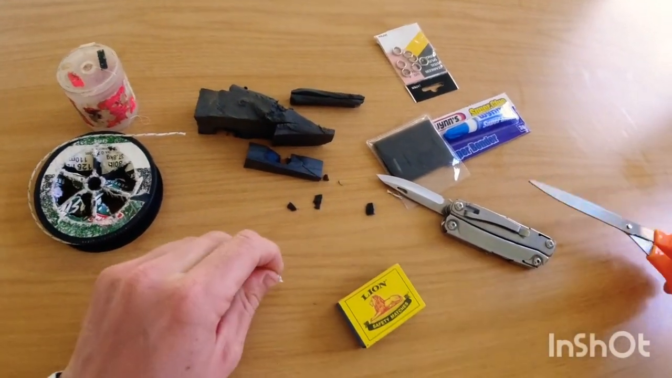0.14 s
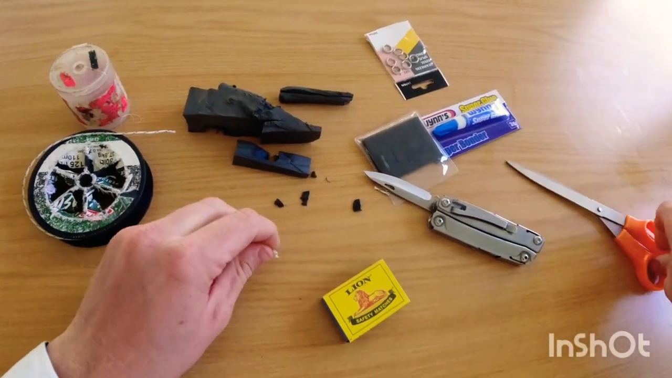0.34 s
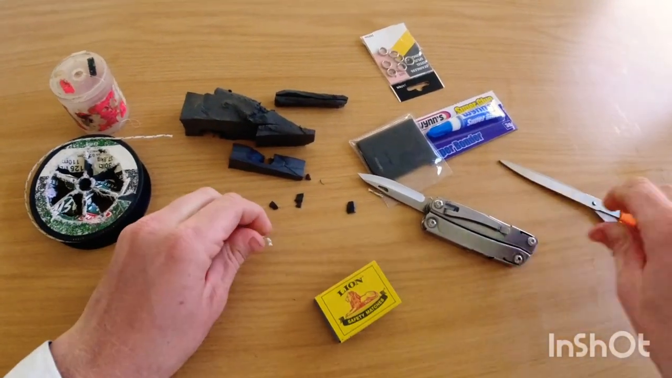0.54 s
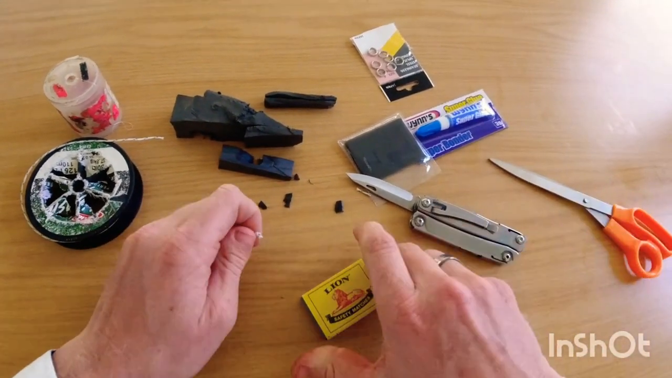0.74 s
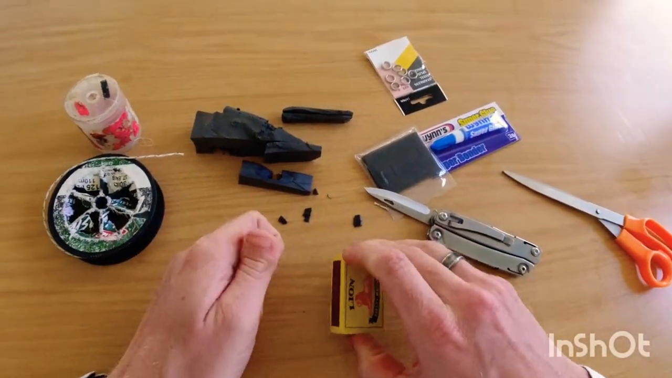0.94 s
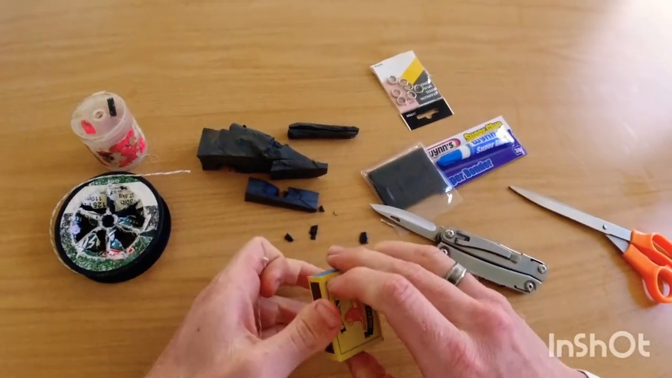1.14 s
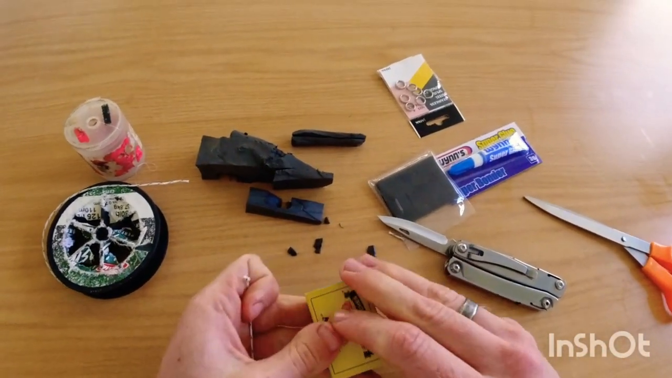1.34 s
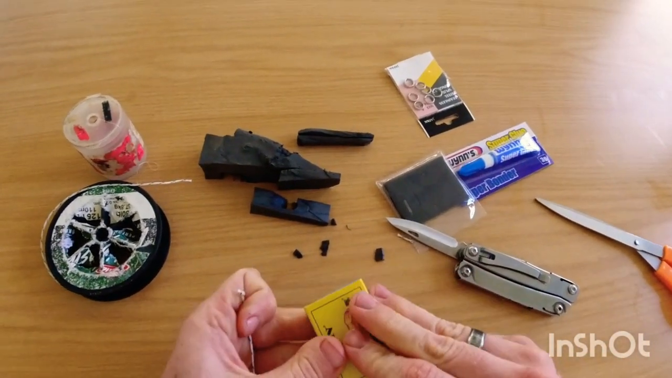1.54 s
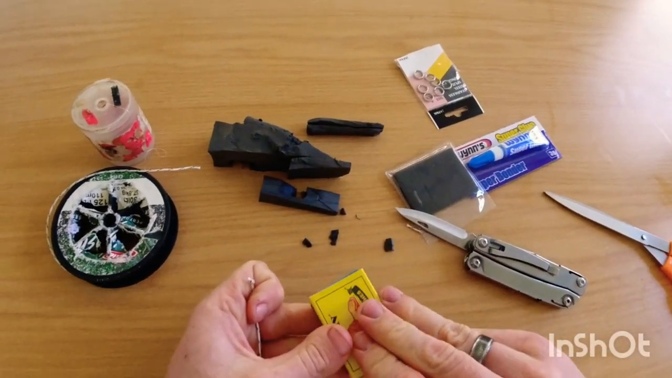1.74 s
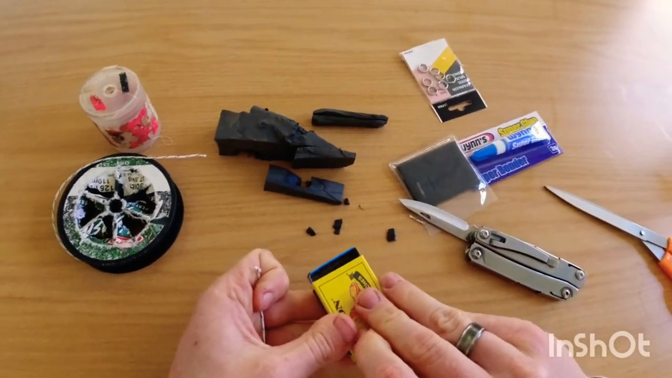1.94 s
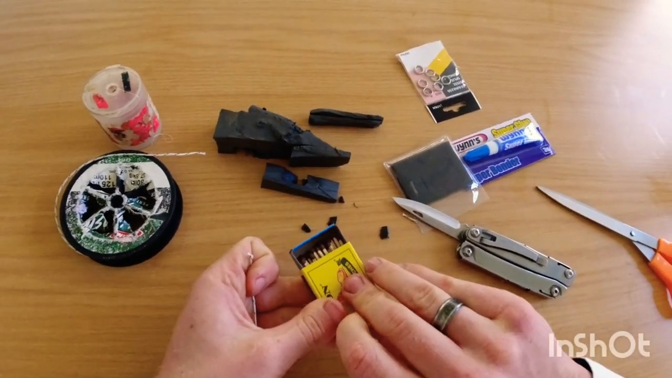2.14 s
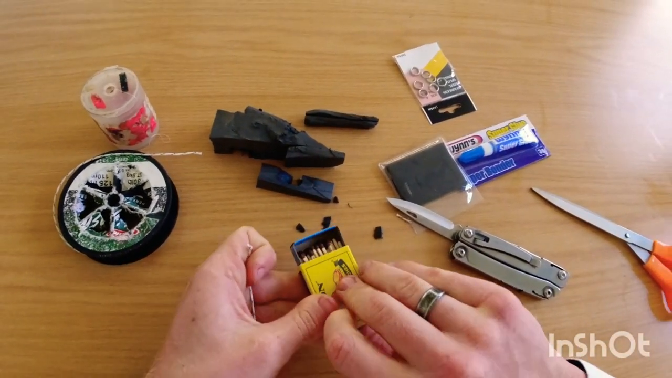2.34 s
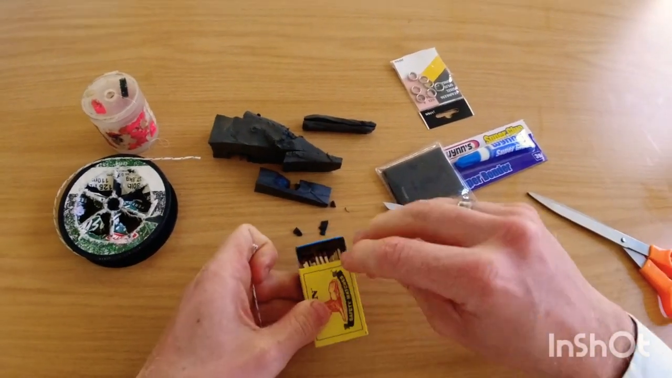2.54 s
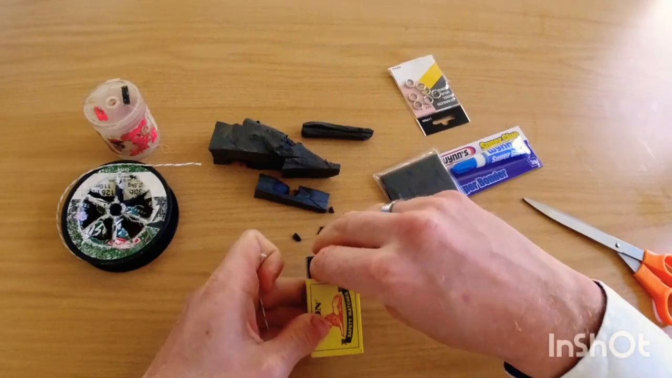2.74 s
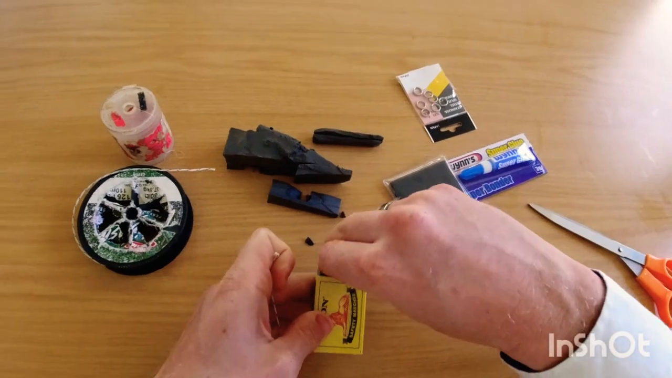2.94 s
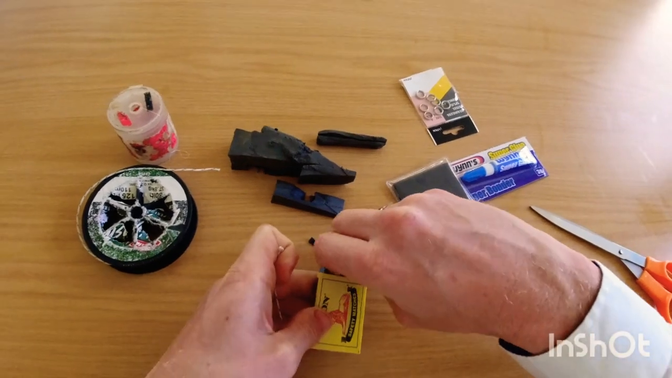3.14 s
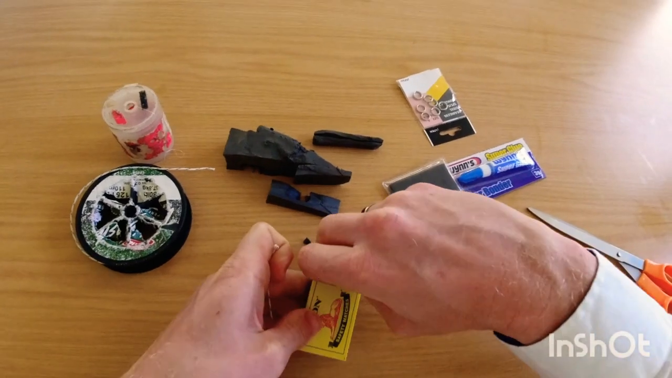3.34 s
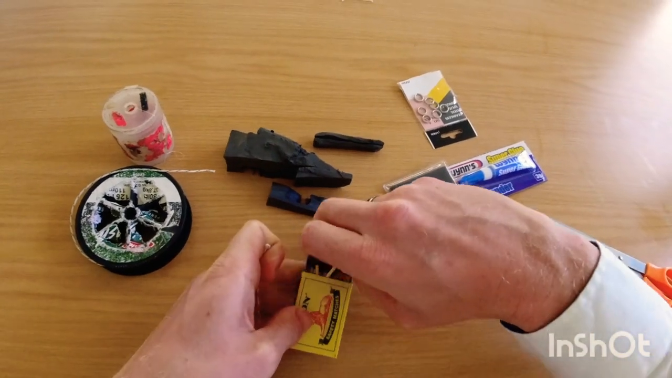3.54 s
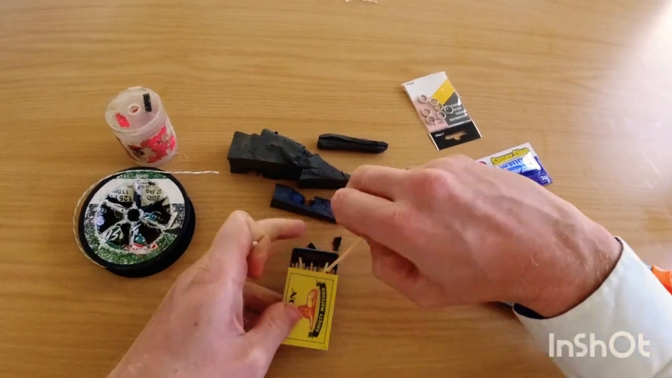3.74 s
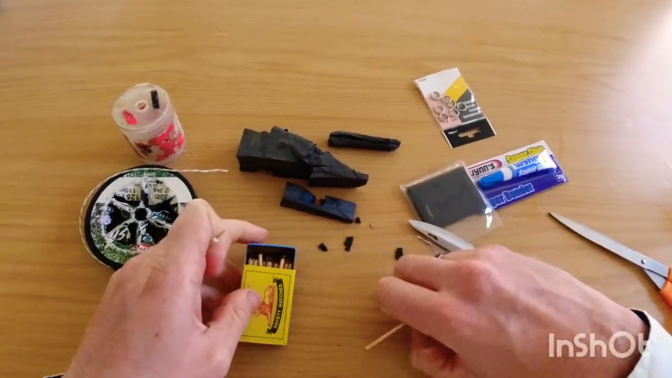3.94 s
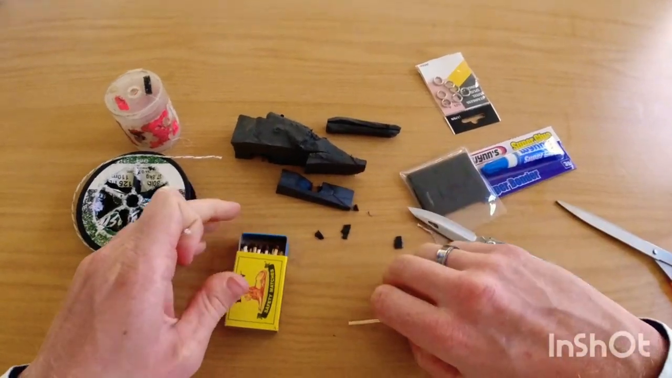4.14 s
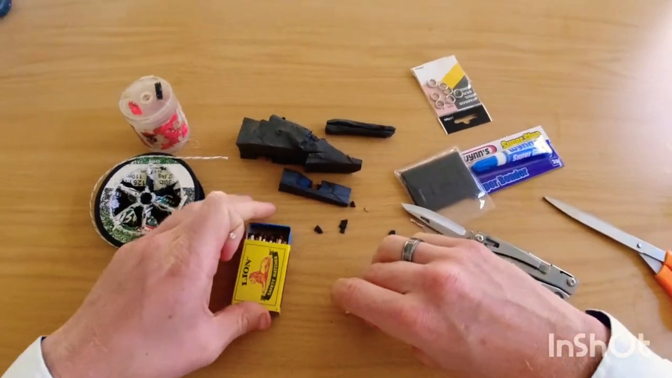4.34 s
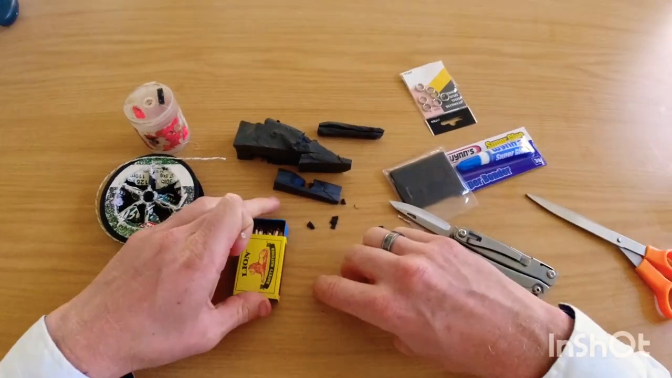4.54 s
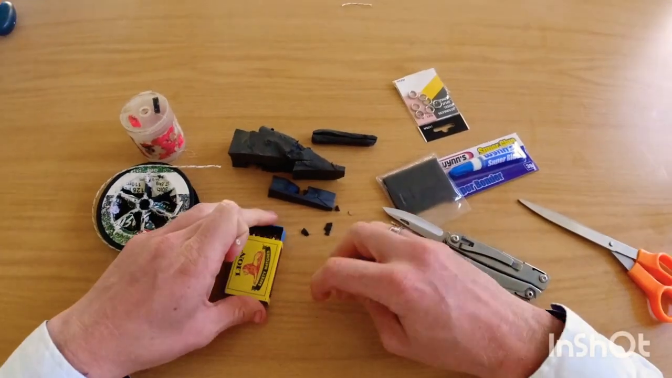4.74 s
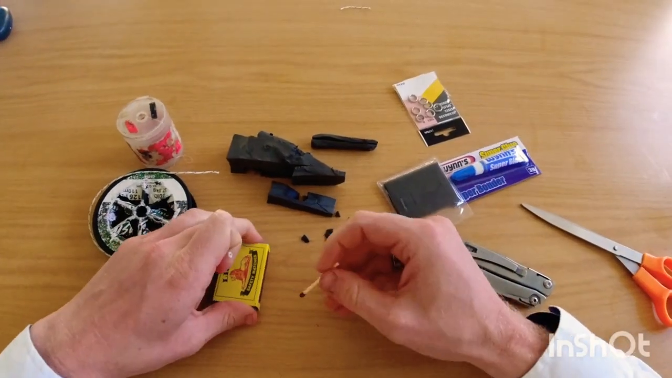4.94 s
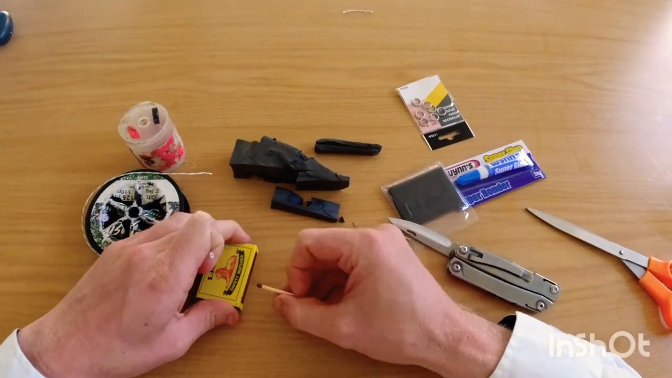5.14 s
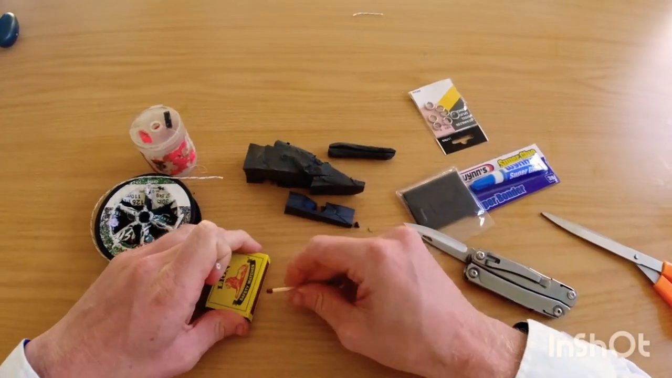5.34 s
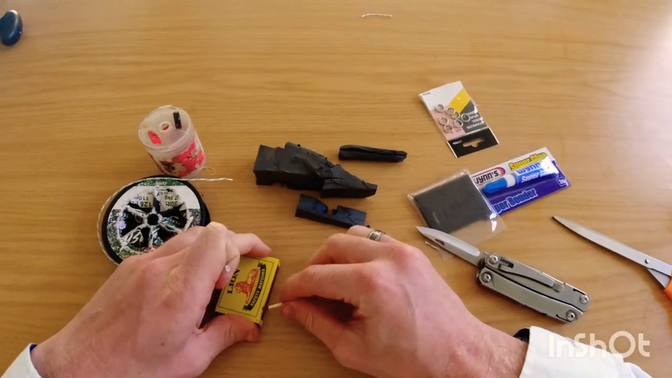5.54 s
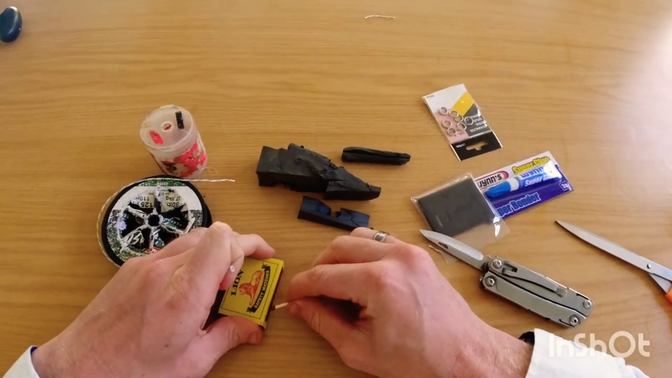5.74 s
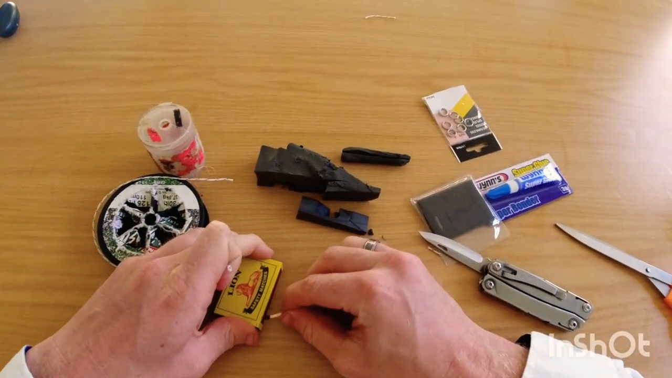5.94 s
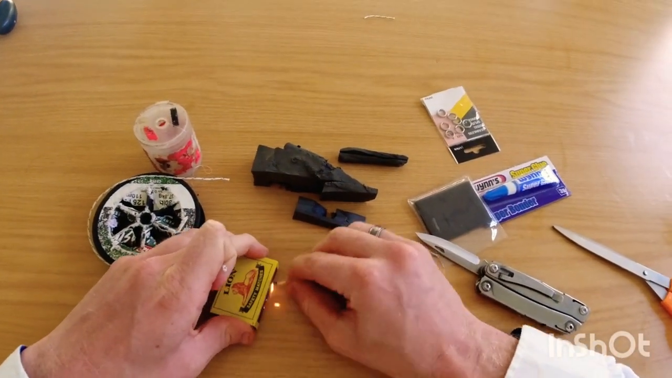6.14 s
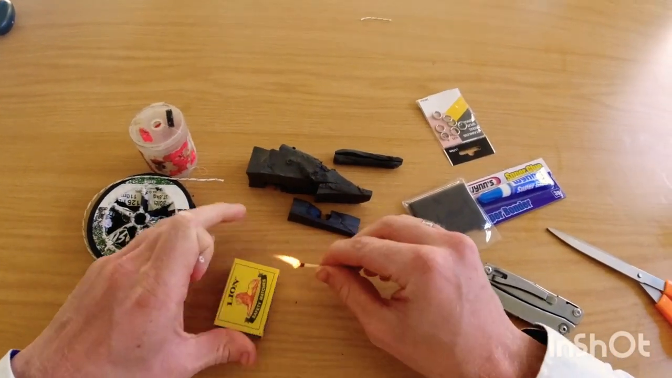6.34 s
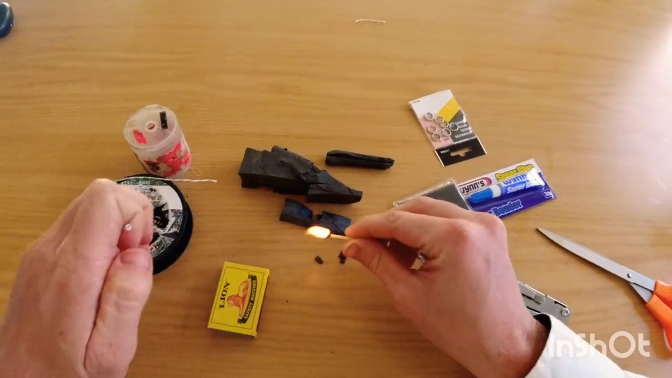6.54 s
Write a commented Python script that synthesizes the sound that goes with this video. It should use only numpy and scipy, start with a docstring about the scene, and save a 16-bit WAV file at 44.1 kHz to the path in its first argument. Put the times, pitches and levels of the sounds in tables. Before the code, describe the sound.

Scissors clatter onto a wooden table, a small matchbox slides open and matchsticks tick, then a match cracks alight and flares briefly in an echoing room.

```python
"""A matchbox handled close below the microphone, over a wooden table in a bare, echoing room: it is picked
up, its drawer slides open, fingers fish out a match and push the drawer shut; at last the match is struck.
Card and sticks are noise through damped resonances; the match is a scrape, a sharp pop and flaring gas noise.
Scissors set down first and a pocket knife knocked later ring with decaying modes, as does the table.
Skin judders over the table top as the box is steadied; echoes, standing waves and a low hush fill the room."""
import sys
import numpy as np
from scipy import signal
from scipy.fft import rfft, irfft, next_fast_len
from scipy.io import wavfile

SR = 44100
rng = np.random.default_rng(int(sys.argv[2]) if len(sys.argv) > 2 else 0)


def digitize_waveform(pressure):
    """Quantize a signal to 16-bit integers and store it at the path in sys.argv[1].

    Rows of a 2-D input are taken as channels; values are limited to [-1, 1].
    """
    field = np.atleast_2d(pressure).T
    bounded = np.clip(field, -1, 1)
    quanta = np.round(bounded * 32767).astype(np.int16)
    wavfile.write(sys.argv[1], SR, quanta)


N = 290561
T = np.arange(N) / SR

# cardboard and matchsticks ticking: (time [s], length [s], level over 5 ms before the trim [dB],
# lower wall [Hz], upper wall [Hz], upper wall [dB], contact)
TICKS = [(.918, 0.0021, -52, 2600, 4300, 6, "base"), (1.159, 0.0014, -53.5, 2500, 3900, -10, "corner"),
         (1.24, 0.0016, -56, 1900, 3200, -5, "finger"),
         (1.256, 0.00087, -45.5, 2200, 3900, -10.5, "finger"),
         (1.309, 0.0023, -59, 2200, 3200, -4, "finger"), (1.353, .0023, -55, 1900, 2900, -3, "finger"),
         (1.856, 0.0068, -44.5, 2200, 4100, -6.5, "finger"), (1.905, .007, -47.5, 2300, 4000, -5, "finger"),
         (1.95, 0.0079, -41.5, 2100, 3500, -4, "drawer"), (1.9615, 0.004, -37.5, 2100, 3700, -3, "drawer"),
         (1.984, 0.0043, -48, 2100, 3600, 2, "drawer"), (2.029, 0.0044, -43, 2200, 3900, 3, "drawer"),
         (2.061, 0.0025, -49, 2200, 4100, 10, "drawer"), (2.075, 0.011, -38, 2100, 3700, -4, "drawer"),
         (2.091, 0.0085, -37, 2100, 3900, 6, "drawer"), (2.791, 0.002, -40, 2300, 3500, -3, "floor"),
         (2.801, 0.0047, -35, 2200, 3400, -15, "tray"), (2.8075, 0.0041, -33, 2300, 3800, -5, "edge"),
         (2.815, 0.0023, -34.5, 2100, 3600, 4, "tray"), (2.8198, 0.0083, -33.5, 2300, 3500, 9.5, "edge"),
         (2.8775, 0.00028, -29, 2120, 3200, -7, "tray"), (2.8826, 0.0006, -36, 2700, 3400, 2, "stick"),
         (2.888, 0.0015, -38, 1920, 3200, -13, "tray"), (3.061, 0.0042, -41.5, 3000, 3900, -5, "stick"),
         (3.0866, 0.0027, -37.5, 3100, 4080, 3, "stick"), (3.0947, 0.0034, -45.5, 2400, 3360, 5, "floor"),
         (3.103, .002, -42, 2900, 3740, 11, "stick"), (3.117, .002, -48.5, 2700, 3900, 5, "stick"),
         (3.142, 0.002, -49, 2650, 3750, 1, "stick"), (3.157, 0.0018, -48.5, 2900, 4200, 13, "stick"),
         (3.166, 0.0038, -42.5, 2900, 3800, 1, "stick"), (3.179, 0.0012, -42.5, 2700, 3900, 7.5, "stick"),
         (3.189, 0.0022, -42, 2700, 3800, 10.5, "stick"), (3.208, 0.0024, -40, 2200, 3850, 6.5, "tray"),
         (3.2125, .002, -39, 2200, 3400, -7.5, "tray"), (3.2187, 0.0021, -44.5, 2260, 3480, 1.5, "tray"),
         (3.39, 0.0038, -55, 2600, 3320, -2.5, "stick"), (3.4105, .0015, -53, 2470, 3200, -6, "stick"),
         (3.4317, 0.0022, -52.5, 3000, 3600, 0.5, "stick"), (3.4716, 0.0018, -44.5, 2370, 3200, -6, "tray"),
         (3.4838, .006, -40.5, 2650, 4160, 11, "tray"), (3.5643, 0.0012, -50, 2900, 3520, 7.5, "stick"),
         (3.5769, .0045, -42, 2300, 3100, -1.5, "tray"), (3.592, 0.0035, -45.5, 2300, 3300, -1, "tray"),
         (3.619, 0.0071, -49.5, 2300, 3300, 0, "tray"), (3.6445, .0026, -50, 2200, 3200, -2, "tray"),
         (3.706, 0.003, -60.5, 2560, 3200, -6, "stick"), (3.725, 0.0019, -45.5, 2550, 3200, -7.5, "stick"),
         (3.7843, .0026, -47, 2880, 3700, 0, "stick"), (3.7942, .0012, -43, 2940, 3610, 1.5, "stick"),
         (3.8168, 0.0029, -52.5, 2900, 3600, 2.5, "stick"), (3.9655, 0.006, -46.5, 3000, 3860, 1, "corner"),
         (4.8245, 0.0055, -44.5, 2230, 3460, -2, "finger"), (4.832, 0.003, -48, 2440, 3200, -13, "corner"),
         (4.8815, 0.0081, -41, 2560, 3400, -6, "stick"), (4.9075, .0033, -47, 2670, 3400, -7, "stick"),
         (4.964, .006, -40.5, 2300, 3870, -6, "edge"), (4.992, 0.0075, -38, 3000, 5000, 0, "edge"),
         (5.06, 0.0047, -53.5, 2800, 3600, -3, "base"), (5.21, 0.025, -46, 2790, 4250, -5, "base"),
         (5.378, .015, -56, 2650, 3600, -8, "base"), (5.768, 0.0035, -52, 2690, 4200, -25, "base"),
         (5.783, 0.0017, -59.5, 2690, 4200, -19, "base"), (5.999, .0025, -49, 2600, 4650, -20.5, "head")]
# strokes of rubbing, from picking up the box to steadying it: (time [s], length [s],
# level before the trim [dB], lower wall [Hz], upper wall [Hz], upper wall [dB], contact)
RUBS = [(.874, 0.031, -57.5, 3050, 4400, -17, "corner"), (0.904, 0.049, -54.5, 2600, 4300, -6, "base"),
        (0.964, 0.047, -60, 2700, 4500, -4, "base"), (1.033, 0.12, -60.5, 2630, 3400, -1, "base"),
        (1.13, 0.043, -64.5, 2630, 4120, 0, "corner"), (1.238, .04, -56.5, 1940, 3000, -1, "finger"),
        (1.279, 0.069, -62, 1880, 2770, -8, "finger"), (1.464, .097, -60.5, 2100, 3400, -4, "grip"),
        (1.597, 0.076, -57, 1720, 4300, -3.5, "grip"), (1.705, 0.058, -68, 2440, 4900, 3, "grip"),
        (1.932, 0.1, -45.5, 1960, 3600, 5, "drawer"), (2.024, 0.064, -50.5, 2040, 3870, 2, "drawer"),
        (2.081, 0.046, -40.5, 2030, 3780, 0, "drawer"), (2.108, 0.047, -48, 1850, 3720, -1, "drawer"),
        (2.188, 0.098, -52.5, 1610, 3300, -2, "drawer"), (2.421, 0.064, -57, 2100, 3280, 3, "finger"),
        (2.463, 0.04, -50, 2170, 4160, 0.5, "drawer"), (3.051, 0.057, -52, 2680, 3820, 3, "stick"),
        (3.149, 0.074, -47, 2650, 3840, 7, "stick"), (3.232, .06, -55, 2180, 3600, -5.5, "tray"),
        (3.471, 0.043, -46, 2580, 4120, -4, "edge"), (3.568, 0.095, -48.5, 2330, 3160, -7.5, "tray"),
        (3.754, 0.046, -51.5, 2550, 3840, 1.5, "stick"), (3.861, .05, -57.5, 2470, 4390, -8, "corner"),
        (3.934, 0.077, -55, 2980, 4220, 6.5, "corner"), (4.421, 0.029, -52, 2760, 4400, -14, "corner"),
        (4.446, 0.034, -55, 2900, 4400, -2, "stick"), (4.661, 0.02, -55.5, 2200, 3310, -4.5, "finger"),
        (4.798, 0.053, -50, 2490, 3660, 2, "tray"), (4.862, 0.064, -46, 2600, 3630, -3, "edge"),
        (4.976, 0.024, -43.5, 3000, 4850, 0.5, "edge"), (4.999, 0.085, -53, 2630, 3870, 2, "base"),
        (5.145, 0.15, -55, 2790, 4250, 1, "base"), (5.657, 0.029, -62, 2350, 4080, -6, "head"),
        (5.748, 0.059, -60.5, 2670, 4350, -28, "base")]
# what touches what: contact: (sharpness [Q], hollow [Hz], hollow [dB], knock [dB], crisp at FIRM_DB [dB],
# room echo [dB], slips when rubbing [1/s], unevenness of grip [dB])
CONTACTS = {"finger": (4, 1203, -18.5, -21, -43, -0.5, 2500, 0),
            "grip": (6, 1197, -17, -25, -37, -4, 4000, 1.5),
            "corner": (5, 1200, -19.5, -20, -22.5, 2, 2500, 1),
            "head": (11.5, 1200, -11, -18, -36, -7, 2500, 0.5),
            "base": (6, 1225, 7, -6, -37, -5, 1500, 2.5), "floor": (1.5, 1047, 3.5, -2, -10, 3.5, 1500, 3),
            "drawer": (4, 1164, -12.5, -15.5, -19, -6.5, 3001, 5),
            "tray": (3, 1055.5, -7.5, -21.5, -27, -2.5, 898.5, 5.5),
            "stick": (2.5, 1037, -9.5, -16.5, -17, -1, 450, 0.5),
            "edge": (1.5, 954.5, -9, -24, -10, -0.5, 2200, 2.5)}
# fibres snapping: (frequency [Hz], level [dB])
CRISP = [(4000, -69), (5400, 3.5), (6200, 6.5), (7500, 5), (9000, -5.5), (13000, -2.5), (15000, -5.5)]
# a contact firmer than FIRM_DB has a stronger crisp edge but a lower treble limit; a lighter one a weaker edge
FIRM_DB, CRISP_PER_DB = -35.5, 0.7
FIRM_HZ, OCTAVES_PER_DB = 10500, -0.36  # treble limit at FIRM_DB and its shift

# the match head scraping and cracking alight: (time [s], length [s], level over 5 ms [dB], lower wall [Hz],
# upper wall [Hz], upper wall [dB], hollow [dB], crisp [dB], hollow [Hz], knock [dB])
POPS = [(6.1876, 0.018, -31.5, 2400, 4500, -11, -7, -23, 1180, -19),
        (6.2025, 0.004, -29.5, 2700, 4780, 4, -9, -17, 1180, -14),
        (6.2052, 0.0015, -17, 2900, 4940, 2, -5.5, -15, 1020, -9.5),
        (6.207, 0.00082, -28.5, 2700, 4600, 0, -4.5, -30, 1100, -19),
        (6.2127, 0.0024, -31, 2700, 4000, -3, -5, -34, 1180, -17),
        (6.218, 0.0012, -43, 2770, 4480, -6, -6, -18, 1180, -21)]
# colour of the burning gas: (frequency [Hz], level [dB])
FLAME = [(40, -43), (100, -19), (170, -5), (280, -7), (660, 0.5), (850, 0), (1220, -3), (1750, -8),
         (2300, -6.5), (2900, -3), (4000, -10), (5500, -7), (6500, -20), (10000, -25.5), (15000, -28)]
SCRAPE_S, SCRAPE_DB = 0.0145, -43.5  # the head drags along the striker just before it lights
FLASH_DB, FLASH_FALL_S = -18, 0.0038  # the first spot ignites
FLARE_DELAY_S, FLARE_WIDTH_S, FLARE_DB = 0.049, 0.029, -30.5  # the whole head catches
BURN_DB, BURN_FALL_S = -39.5, 0.14  # and burns down
ROAR_DB, ROAR_DELAY_S, ROAR_FALL_S = -44.5, .035, 0.14  # a low flutter sets in after ignition and dies away

# the scissors land and rock to rest: (time [s], blow [dB])
LANDING = [(.338, -7), (.3475, -3), (.359, -1), (.368, -3), (.377, -2), (.39, -4.5), (.4, -3.5),
           (.432, -11), (.441, -12.5), (.472, -15.5), (.53, -15), (.572, -12), (.6, -16)]
# colour of the clattering scissors: (frequency [Hz], level [dB])
CLATTER = [(100, -22), (400, -7.5), (1000, -1.5), (2000, -2.5), (4000, -5), (4700, -7), (5400, -4.5),
           (6600, -18.5), (7600, -22), (10000, -17.5), (15000, -18)]
HARD_HZ, SOFT_HZ, SOFTEN_S = 18900, 1250, 0.022  # steel lands first, then ever softer blows of the handles
RATTLE_PER_S, RATTLE_FALL_S = 1500, 0.018  # the loose pivot chatters after each blow
# steel touching down: (time [s], length [s], level over 5 ms before the hardness filter [dB],
# lower wall [Hz], upper wall [Hz], upper wall [dB], hollow [dB], crisp [dB],
# jangle [dB], ring [dB], hardness [Hz], what is struck)
STEEL_TAPS = [(0.0996, .003, -39, 2590, 4300, -1, -4.5, -6.5, -16, -10, 10500, "blades"),
              (0.337, .003, -35.5, 3600, 5310, 11.5, -19.5, -1.5, -12.5, -17, 18000, "blades"),
              (.347, .002, -35.5, 3590, 5290, 6.5, -19.5, 2, -7.5, -10.5, 18000, "blades"),
              (4.0837, .0032, -27.5, 2950, 3990, -0.5, -24.5, -7.5, -7, -14, 18000, "knife")]
# loose steel parts: (frequency [Hz], level [dB])
JANGLE = [(300, -15.5), (750, -6.5), (1300, -4), (1800, 13.5), (3200, -8.5), (5500, 7), (7400, -5),
          (9000, -16), (15000, -9.5)]
# what the scissor blades ring with: (frequency [Hz], t60 [s], level [dB])
BLADES = [(791, .12, 3.5), (1360, .09, -3.5), (2164, .07, -2), (2620, .06, 3), (3074, .056, -4),
          (3860, .07, 1.5), (5250, .1, 2), (6270, .1, -9), (7580, .12, -2.5), (7700, .12, -9.5)]
# what the pocket knife rings with: (frequency [Hz], t60 [s], level [dB])
KNIFE = [(1780, 0.26, -2), (1890, 0.28, -2), (2950, 0.13, -5), (5460, .13, -5), (5860, 0.18, -16),
         (7000, 0.33, -5), (7270, 0.33, -1.5), (11200, 0.21, -14)]

# hands, scissors and box bumping the table: (time [s], blow before the trim [dB],
# contact softness [Hz], spot)
BUMPS = [(.1, -16.5, 128, "middle"), (.342, -7, 400, "middle"), (0.529, -2.5, 76, "middle"),
         (.574, -8, 75, "middle"), (.775, -13.5, 90, "edge"), (.861, -19.5, 90, "edge"),
         (1.414, -36, 708, "edge"), (2.614, -31, 1285, "middle"), (3.942, -17.5, 353, "middle"),
         (4.038, -3, 420, "edge"), (4.058, -14.5, 450, "edge"), (4.087, -14, 450, "edge"),
         (4.887, -16, 544, "edge"), (4.989, -14, 500, "edge"), (5.15, -12.5, 450, "middle"),
         (5.661, -16, 104, "edge")]
# what the table top rings with: (frequency [Hz], t60 [s], level struck in the middle [dB],
# level struck at the front edge [dB])
TABLE = [(56, .28, 9, -4.5), (101.9, .25, 0, 10), (162.2, 0.1, -1, -8.5), (212, 0.21, 1.5, -1),
         (267.2, 0.32, -9, 4.5), (338.7, .15, 6.5, -13.5), (414, 0.061, 4.5, -8.5), (527, .12, 9, 1),
         (946, .14, 4.5, -4), (1062, .1, 5.5, -9), (1180, .14, 1, -7), (1435, 0.061, 2, -11.5),
         (1615, 0.09, -6.5, -12.5), (1818, .1, 6, -11)]
JUDDER_S, JUDDER_LENGTH_S, JUDDER_DB = 5.125, 0.31, -51.5  # skin judders over the table top
JUDDER_HZ, JUDDER_SLOW_HZ, JUDDER_RISE_S = 264.8, 224.8, 0.0617  # the slips speed up to a steady rate

# difference between the microphone ports for near sound: (frequency [Hz], side level [dB])
PORTS = [(60, -26), (400, -23.5), (1300, -15), (2500, -13), (4500, -8), (8000, 5.5), (15000, -0.5)]
# the room: (frequency [Hz], t60 [s], echo [dB], side relative to echo [dB])
ROOM = [(60, 1.3, -2.5, -28), (254, 0.68, -6, -20.5), (710, 0.85, -0.5, -15.5), (1340, 0.81, 2, -8),
        (2500, 0.82, -2.5, -2.5), (4400, 0.71, -4, 1), (8600, 0.5, 7, -1), (14940, 0.15, -5, 3.5)]
# standing waves of the room: (frequency [Hz], t60 [s], level [dB])
STANDING = [(57.4, .26, -11), (94.9, 1, 0.5), (162, 0.97, 4.5), (210.9, 1, -2), (264.7, 0.84, 0),
            (370, .6, -5), (522, 0.57, -5.5), (654, .9, -0.5), (669, 1, 3.5), (769, 1, -3.5),
            (949, .8, -0.5), (1152, .8, -1), (1298, 0.6, 0.5), (1510, .8, 1.5)]
DIFFUSE_S = .13  # single reflections thicken into a smooth tail
# colour of the quiet room: (frequency [Hz], level [dB])
HUSH = [(15, 3), (30, -13.5), (49, 4.5), (72, -21), (100, -5), (130, -15), (360, -23.5), (700, -25.5),
        (1300, -27), (3500, -35), (6000, -44), (14000, -78)]
HUSH_DB = -61
TOP_HZ = 15400  # upper limit of the phone


def matchbox(tick_db=-1.0, rub_db=-2):
    """Card and sticks tick and rub, firmer ones with more crisp edge; gives near sound and the room's share."""
    direct, spill = np.zeros((2, N))
    for table in (TICKS, RUBS):
        for s, length, db, lower_hz, upper_hz, upper_db, contact in table:
            q, hollow_hz, hollow_db, knock_db, crisp_db, echo_db, per_s, patchy_db = CONTACTS[contact]
            firmness = db - FIRM_DB
            crisp_db = crisp_db + CRISP_PER_DB * firmness
            # each grip tunes the walls anew
            timbre = lower_hz, upper_hz, upper_db, hollow_db, crisp_db, hollow_hz, knock_db, q
            if table is TICKS:
                x = tick(length, db + tick_db, *timbre)
            else:
                x = rub(length, db + rub_db, per_s, patchy_db, *timbre)
            limit_hz = max(FIRM_HZ * 2 ** (OCTAVES_PER_DB * firmness), 7900)
            x = sift(x, limit_hz, "low", order=6)
            add(direct, s, x)
            add(spill, s, amp(echo_db) * x)
    return direct, spill


def tick(length, db, *timbre):
    """One hard contact and a short spray of slips that swells and fades after it."""
    count = int(length * SR) + 2
    spray = np.sin(np.pi * np.linspace(0, 1, count) ** 0.53)
    push = unit(rng.standard_normal(count) * spray) * np.sqrt(length / 0.00053)
    push[0] -= 1  # the hard contact
    return amp(db) * np.sqrt(SR / 200) * body(push, *timbre)  # level over 5 ms


def rub(length, db, per_s, patchy_db, *timbre):
    """A stroke of stick and slip whose grip comes and goes."""
    count = int(length * SR)
    grip = np.interp(T[:count], np.arange(60) / 170, rng.standard_normal(60))  # 170 random points per s
    slips = grit(count, per_s=per_s, spread_db=-2.5)
    push = slips * amp(patchy_db * grip) * signal.windows.tukey(count, .5)
    return amp(db) * np.sqrt(count) * body(push, *timbre)


def body(push, lower_hz, upper_hz, upper_db, hollow_db, crisp_db, hollow_hz=1180, knock_db=-17, q=2.3,
         skirt=0.12):
    """A small, damped thing: two wall resonances, a hollow under them, a crisp edge above and a low knock."""
    push = np.pad(push, (0, SR // 50))  # room to ring out

    def wall(hz):
        """One wall: a sharp resonance on a broad skirt, band limited."""
        x = resonate(resonate(push, hz, q), hz, q * skirt)
        return unit(sift(sift(x, 770, "high"), 5230, "low", order=10))

    walls = unit(wall(lower_hz) - amp(upper_db) * wall(upper_hz))
    hollow = resonate(resonate(push, hollow_hz, q * .7), hollow_hz, q * .4)
    hollow = unit(sift(hollow, 350, "high"))
    crisp = unit(colour(push, CRISP))
    knock = unit(sift(push, [520, 930], "band"))
    return unit(walls + amp(hollow_db) * hollow + amp(crisp_db) * crisp + amp(knock_db) * knock)


def match(puff_db=-3, sputter_db=2.5, sizzle_db=-1.0):
    """The head scrapes, pops with a puff of pressure and burns: rushing gas, sizzling grains, low flutter."""
    ignition_s = max(POPS, key=lambda pop: pop[2])[0]  # the loudest crack
    rush = unit(rng.standard_normal(N)) * amp(sputter_db * waver(95))
    grains = unit(grit(N, per_s=1000, spread_db=4.5))
    sizzle = sift(grains, 1460, "high", order=1) * amp(sputter_db * waver(140))
    gas = colour(sift(rush, 3000, "low", order=1) + amp(sizzle_db) * sizzle, FLAME)
    flutter = unit(sift(rng.standard_normal(N), [125, 210], "band"))
    roar = flutter * amp(ROAR_DB) * fall(ignition_s + ROAR_DELAY_S, ROAR_FALL_S)
    out = (unit(gas) * gas_flow(ignition_s) + roar) * np.sqrt(N)
    for s, *crack in POPS:
        add(out, s, tick(*crack))
    puff = unit(sift(signal.unit_impulse(SR // 50), [330, 1100], "band"))
    add(out, ignition_s, amp(puff_db) * puff)
    return out


def gas_flow(ignition_s):
    """Strength of the rush: a scrape, a flash, the flare of the whole head and a dying burn."""
    scrape = amp(SCRAPE_DB) * (T > ignition_s - SCRAPE_S) * (T < ignition_s)
    flash = amp(FLASH_DB) * fall(ignition_s, FLASH_FALL_S)
    flare = amp(FLARE_DB) * np.exp(-.5 * ((T - ignition_s - FLARE_DELAY_S) / FLARE_WIDTH_S) ** 2)
    burn = amp(BURN_DB) * fall(ignition_s, BURN_FALL_S)
    return np.sqrt(scrape ** 2 + flash ** 2 + flare ** 2 + burn ** 2)


def scissors(table_db=-7, clatter_db=-3, blade_db=-14):
    """Handles and blades clatter down and set the table ringing; the later, softer blows are dull."""
    out = np.zeros(N)
    first_s = LANDING[0][0]
    for s, db in LANDING:
        soft_hz = SOFT_HZ + (HARD_HZ - SOFT_HZ) * np.exp((first_s - s) / SOFTEN_S)
        clatter = unit(colour(rattle(RATTLE_PER_S, RATTLE_FALL_S), CLATTER))
        blow = amp(table_db) * table_ring("middle") + amp(clatter_db) * clatter
        blow = blow + amp(blade_db) * ring(BLADES)
        add(out, s, amp(db) * sift(blow, soft_hz, "low"))
    return out


def steel():
    """Scissor blades and later the pocket knife are knocked, jangle and ring, each with its own modes."""
    out = np.zeros(N)
    for s, *touch, jangle_db, ring_db, hard_hz, thing in STEEL_TAPS:
        tap = sift(tick(*touch), hard_hz, "low", order=6)
        jangle = unit(colour(rattle(700, 0.035), JANGLE))
        modes = BLADES if thing == "blades" else KNIFE
        after = amp(jangle_db) * jangle + amp(ring_db) * ring(modes)
        add(out, s, tap)
        add(out, s, np.linalg.norm(tap) * after)  # scaled by the strength of the tap
    return out


def rattle(per_s, decay_s, count=SR // 3):
    """Loose parts chatter in tiny clicks that die away."""
    return grit(count, per_s, spread_db=1.5) * np.exp(-T[:count] / decay_s)


def bumps(bump_db=-13):
    """Soft blows reach only the low modes of the table."""
    out = np.zeros(N)
    for s, db, soft_hz, spot in BUMPS:
        thud = unit(sift(burst(0.0039), [70, 900], "band"))
        blow = sift(table_ring(spot) + 0.99 * thud, 50, "high")
        add(out, s, amp(db + bump_db) * unit(sift(blow, soft_hz, "low")))
    return out


def table_ring(spot):
    """The table top after a blow in the middle or at the front edge, which excite its modes differently."""
    modes = [(hz, t60, middle_db if spot == "middle" else edge_db) for hz, t60, middle_db, edge_db in TABLE]
    return ring(modes)


def judder(wobble=0.018, first_db=-4, ragged_db=3):
    """Nearly regular slips of skin on varnish swell and fade, uneven in rate and strength."""
    hz = JUDDER_HZ + (JUDDER_SLOW_HZ - JUDDER_HZ) * fall(JUDDER_S, JUDDER_RISE_S)
    phase = 2 * np.pi * np.cumsum(hz * (1 + wobble * waver(46.7))) / SR
    slips = amp(first_db) * np.sin(phase) + np.sin(2 * phase)
    swell = np.sin(np.pi * np.clip((T - JUDDER_S) / JUDDER_LENGTH_S, 0, 1))
    return slips * swell * amp(JUDDER_DB + ragged_db * waver(50))


def near(x, aside_db=0):
    """Direct sound is equally loud at both microphone ports, but out of step in the treble, more from aside."""
    size = next_fast_len(N + 1024)
    hz = np.fft.rfftfreq(size, 1 / SR)
    skew = 1j * np.sqrt(2) * np.sin(2 * np.pi * hz * 0.00028)
    side = irfft(rfft(x, size) * skew * amp(aside_db + contour(PORTS, size)), size)[:N]
    return pair(x, side)


def room(x, build_s=0.001, standing_db=-20, size=512):
    """Separate reflections thicken into a tail, the treble dying soonest; a few standing waves hang on."""
    density = np.clip(.012 + (T[:SR] / DIFFUSE_S) ** 2, .001, 1)
    echoes = rng.standard_normal((2, SR)) * (rng.random((2, SR)) < density) / np.sqrt(density)
    _, t, noise = signal.stft(echoes, SR, nperseg=size)
    t60, db, side_db = (contour(np.array(ROOM)[:, [0, k]], size)[:, None] for k in range(1, 4))
    fade = np.exp(-np.log(1000) * t / t60)
    fade = fade * np.sqrt(2 * np.log(1000) / t60 / SR)  # unit energy at every pitch
    mid, side = signal.istft(noise * fade * amp([db, db + side_db]), SR, nperseg=size)[1][:, :SR]
    tail = pair(mid, side) * (1 - np.exp(-T[:SR] / build_s))
    tail = tail + amp(standing_db) * ring(STANDING, count=SR)
    return signal.fftconvolve(x[None], tail, axes=1)[:, :N]


def hush():
    """Low rumble and faint hiss of the quiet room, wider in the treble."""
    mid, side = (unit(colour(rng.standard_normal(N), HUSH)) * np.sqrt(N) for _ in range(2))
    side = colour(side, [(100, -16.0), (600, -9.0), (2500, -4.0), (8000, 0)])  # (Hz, dB)
    return amp(HUSH_DB) * pair(mid, side)


def ring(modes, count=SR // 3):
    """Decaying modes after one blow; each blow lands on a slightly different spot."""
    t = T[:count]
    out = np.zeros(count)
    for hz, t60, db in modes:
        level = amp(db + rng.normal(0, 1.0))
        tone = np.sin(2 * np.pi * hz * rng.normal(1, 0.0025) * t)
        out += level * unit(tone * np.exp(-np.log(1000) * t / t60))
    return unit(out)


def grit(count, per_s, spread_db):
    """Tiny slips of either sign at random moments; exponential draws spread their strength in dB."""
    size = amp(spread_db * np.minimum(rng.exponential(size=count), 3.5))
    return (rng.random(count) < per_s / SR) * size * rng.choice([-1, 1], count)


def burst(decay_s, count=SR // 3):
    """Noise that dies away exponentially."""
    return rng.standard_normal(count) * np.exp(-T[:count] / decay_s)


def waver(hz):
    """A smooth random wander with a spread of one."""
    return unit(sift(rng.standard_normal(N), hz, "low")) * np.sqrt(N)


def fall(s, time_s):
    """Nothing until time s, then an exponential fall from one."""
    return (T >= s) * np.exp(-np.maximum(T - s, 0) / time_s)


def resonate(x, hz, q):
    """One broad resonance."""
    return signal.lfilter(*signal.iirpeak(min(hz, SR / 4), max(q, .6), fs=SR), x)


def sift(x, hz, kind, order=2):
    """Butterworth filter."""
    hz = np.clip(hz, 10, SR / 2 - 1000)
    return signal.sosfilt(signal.butter(order, hz, kind, fs=SR, output="sos"), x)


def colour(x, points, size=4096):
    """Causal, minimum-phase filter with a spectrum of (Hz, dB) points."""
    cepstrum = irfft(np.log(amp(contour(points, size))))
    cepstrum[1:size // 2] *= 2
    cepstrum[size // 2 + 1:] = 0
    return signal.fftconvolve(x, irfft(np.exp(rfft(cepstrum))))[:len(x)]


def contour(points, size):
    """Join (Hz, value) points over the bins of a transform."""
    hz, value = np.transpose(points)
    return np.interp(np.log(np.fft.rfftfreq(size, 1 / SR) + 1), np.log(hz), value)


def amp(db):
    """Decibels to gain."""
    return 10 ** (np.asarray(db) / 20)


def unit(x):
    """Scale to an energy of one."""
    return x / np.sqrt(np.sum(x ** 2) + 1e-20)


def add(track, s, x):
    """Mix x into the track from time s on."""
    i = int(s * SR)
    track[i:i + len(x)] += x[:N - i]


def pair(mid, side):
    """Mid and side to left and right."""
    return np.array([mid + side, mid - side])


def scene():
    """Each source with its own share of room echo; the scissors lie off to one side."""
    box, box_spill = matchbox()
    clatter = scissors()
    # (near sound, gain into the room)
    sources = [(match(), amp(-1.0)), (steel(), amp(-2.0)), (bumps(), amp(7.5)), (judder(), amp(-10.0))]
    direct = box + sum(x for x, wet in sources)
    spill = amp(-1.5) * box_spill + amp(3) * clatter + sum(x * wet for x, wet in sources)
    return near(direct) + near(clatter, aside_db=8.0) + room(spill) + hush()


def record(dry):
    """The phone cuts the top of the treble with a steep low-pass."""
    return signal.sosfilt(signal.ellip(8, .2, 70, TOP_HZ, fs=SR, output="sos"), dry)


dry = scene()
out = record(dry)
digitize_waveform(out)
```